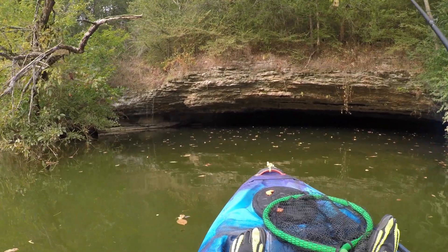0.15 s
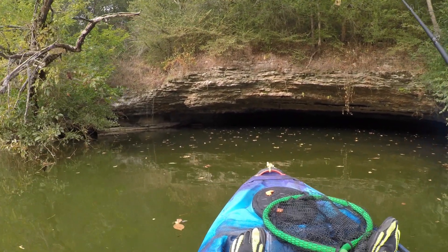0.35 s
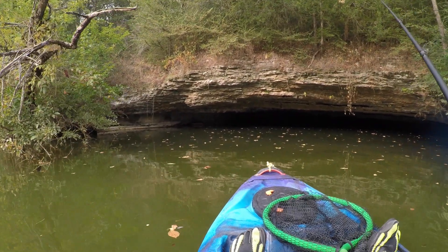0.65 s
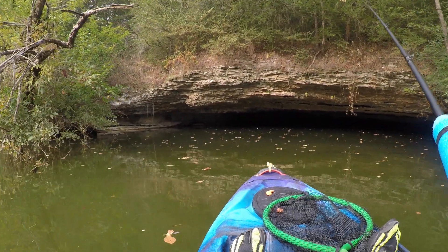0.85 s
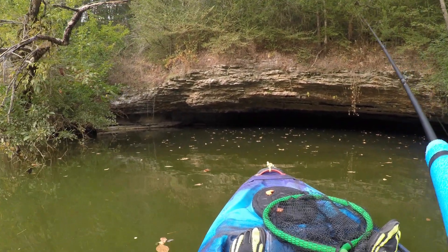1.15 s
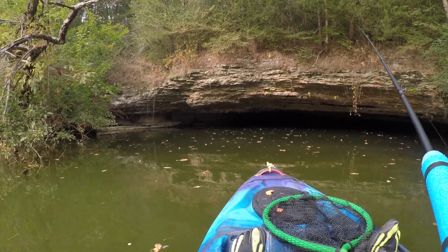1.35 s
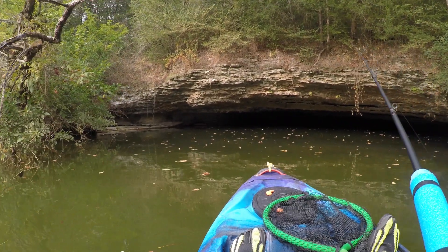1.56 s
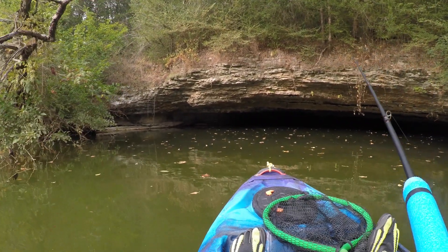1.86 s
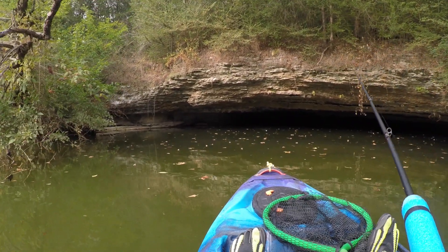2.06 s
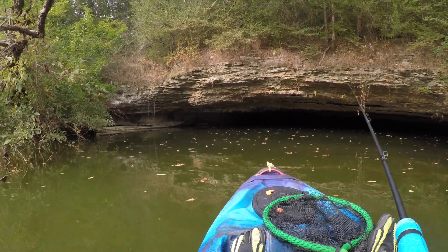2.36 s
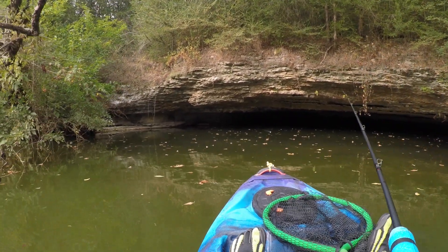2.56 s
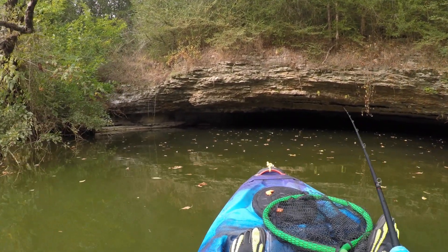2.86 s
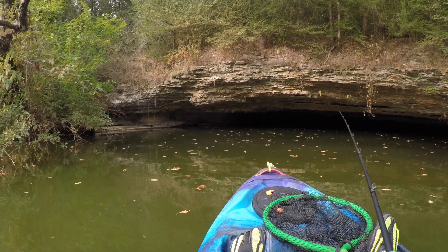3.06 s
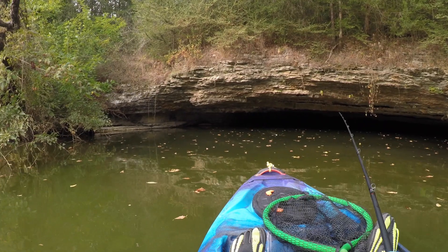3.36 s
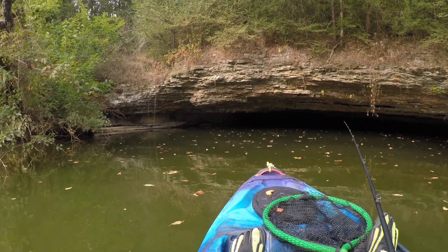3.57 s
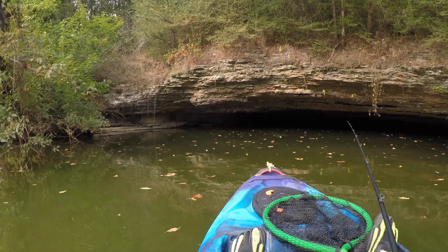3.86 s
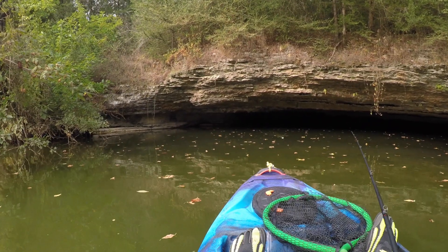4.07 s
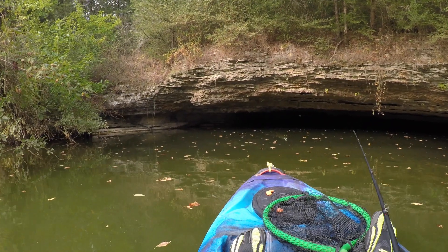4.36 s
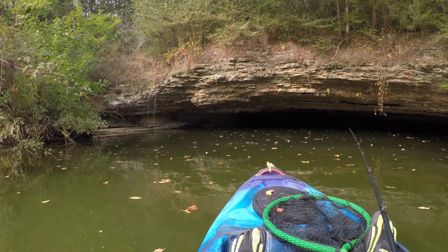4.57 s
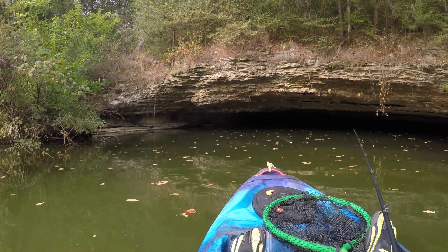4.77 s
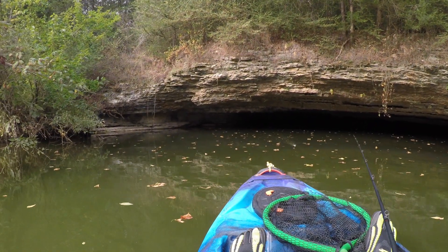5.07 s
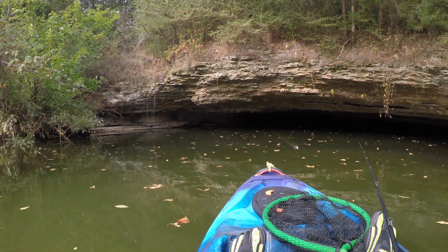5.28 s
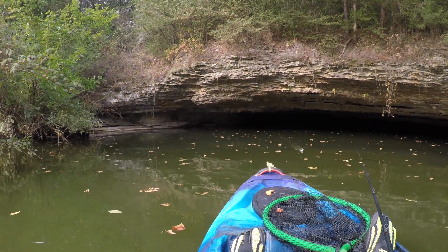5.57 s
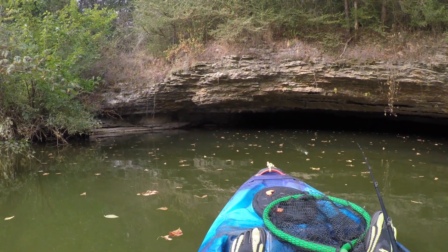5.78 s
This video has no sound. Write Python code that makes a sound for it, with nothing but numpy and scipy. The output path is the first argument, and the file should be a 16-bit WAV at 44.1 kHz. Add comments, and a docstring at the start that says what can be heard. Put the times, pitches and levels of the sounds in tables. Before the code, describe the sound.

A propeller plane drones over a wooded river throughout, a low hum above a broad, soft roar. The hum swells over the first second, dips near 3.3 seconds, is loudest around 4.2 and eases a little, its pitch slowly sinking as the plane recedes. A much quieter bird gives four short nasal calls on the right, at the very start and at about 1, 3.5 and 4.9 seconds, each scooping up and drooping with an echo among trees. Small drips plink on the right during the first 1.4 seconds over a faint, fading trickle. Katydids buzz in high phrases that build toward 2.5 and 4.5 seconds, with dry ticks around 1.3, from 3 to 3.7 and near 5.5. A thin cricket trill comes and goes, and far birds chip near 2.7 and 4.6 seconds. Leaves and distant insects hiss softly while a light breeze rumbles.

```python
"""A propeller plane drones away over a wooded river, heard from a drifting kayak.
Its blade tone sinks and fades through echoes over a broad roar, while a bird gives four nasal calls.
On the banks two katydids buzz and tick with their wings, a cricket trills and far birds chip.
Leaves and far insects hiss, a breeze rumbles, and water drips and trickles on the right."""
import sys
import numpy as np
from scipy import signal
from scipy.fft import rfft, irfft
from scipy.io import wavfile
from scipy.ndimage import uniform_filter1d

SR = 44100
rng = np.random.default_rng(int(sys.argv[2]) if len(sys.argv) > 2 else 0)


def inscribe(sig):
    """Save sig as 16-bit PCM at rate SR to the path in sys.argv[1].

    A 1-D sig is mono; a 2-D sig holds one channel per row.
    Samples are clipped to [-1, 1] before scaling.
    """
    pcm = np.round(np.clip(np.atleast_2d(sig).T, -1, 1) * 32767)
    wavfile.write(sys.argv[1], SR, pcm.astype(np.int16))


N = 260631

# Phase between the ears. Each row: frequency in Hz, lead of the left side in radians.
LEFT_LEAD = [(20, 0), (600, .3), (1000, .5), (1500, 1.8), (2200, 2), (2600, .2), (4200, .1), (4800, -2.4),
             (6500, -2.3), (9000, -3.2), (12000, -3.3), (13500, -5), (15000, -5.5)]


def amp(db):
    """Decibels to gain."""
    return 10 ** (np.asarray(db) / 20)


def unit_rms(x):
    """Scales x to rms 1."""
    return x / np.sqrt(np.mean(abs(x) ** 2) + 1e-20)


def spectrum_at(rows, hz):
    """Reads a spectrum table on a log-frequency axis."""
    row_hz, values = np.transpose(rows)
    return np.interp(np.log(hz + 1), np.log(row_hz + 1), values)


def curves_at(rows, t):
    """Reads every curve of a timed table at the times t."""
    times, *curves = np.transpose(rows)
    return [np.interp(t, times, curve) for curve in curves]


def panned(x, lean_db):
    """Places x in stereo; lean_db is left minus right."""
    return np.array([x * amp(lean_db / 2), x * amp(-lean_db / 2)])


def wander(hz, size=N):
    """Random drift of rms 1, changing about hz times a second."""
    white = rng.standard_normal(size + SR // 4)
    return unit_rms(signal.lfilter(*signal.butter(2, hz / (SR / 2)), white)[-size:])


def diffuse_noise(colour, patchy_db, tilt=None, size=1024):
    """Wide noise of rms 1 in drifting patches; tilt(t, hz) adds a moving colour in dB."""
    # Stereo width. Each row: frequency in Hz, likeness of the two sides from 0 to 1.
    likeness = [(30, .3), (70, .7), (150, .75), (350, .55), (550, .6), (750, .2), (1100, .2), (1600, .42),
                (2600, .3), (3600, .5), (4800, .37), (6000, .45), (8000, .48), (10000, .48), (11500, .3),
                (13000, .4), (15000, .45)]
    # Stereo balance. Each row: frequency in Hz, left minus right in dB.
    balance = [(60, -9), (120, -0.5), (240, 8.5), (470, 0), (940, 1.5), (1870, -3), (3720, -5.5),
               (7410, -2), (14700, -3.5)]
    hop = size // 4
    frames, hz = N // hop + 5, np.fft.rfftfreq(size, 1 / SR)[:, None]
    a, b, c, d, patches = rng.standard_normal((frames, len(hz), 5)).T
    patches = unit_rms(uniform_filter1d(uniform_filter1d(patches, size=9, axis=0), size=16, axis=1))
    shared, lean_db = np.clip(spectrum_at(likeness, hz), 0, 1), spectrum_at(balance, hz)
    right = a + 1j * b
    left = shared * right * np.exp(1j * spectrum_at(LEFT_LEAD, hz))
    left += np.sqrt(1 - shared ** 2) * (c + 1j * d)
    spectra = np.array([left * amp(lean_db / 2), right * amp(-lean_db / 2)])
    spectra *= amp(spectrum_at(colour, hz) + patchy_db * patches)
    if tilt:
        spectra *= amp(tilt(np.arange(frames) * hop / SR, hz))
    return unit_rms(signal.istft(spectra, nperseg=size, noverlap=size - hop)[1][:, :N])


def blips(events, ring_s, noisy, lean_db, rise=0.012):
    """Short dying tones in a puff of noise; the pitch climbs by the share rise each ring time."""
    size = 4000
    out, age = np.zeros(N + size), np.arange(size) / SR / ring_s
    for (start, db, hz), white in zip(events, rng.standard_normal((len(events), size))):
        tone = np.sin(2 * np.pi * hz * ring_s * age * (1 + rise * (age / 2 - 1)))
        puff = unit_rms(signal.lfilter(*signal.butter(2, (hz * .85, hz * 1.3), "band", fs=SR), white))
        at = round(start * SR)
        out[at:at + size] += amp(db) * age * np.exp(1 - age) * (tone + noisy * puff)
    return panned(out[:N], lean_db)


def wing_strokes(per_s, depth):
    """A level that throbs once per wing stroke, no two strokes alike."""
    turns = np.cumsum(per_s * (1 + .012 * wander(2.9))) / SR + rng.random()
    throb = 1 + depth * np.cos(2 * np.pi * turns)
    return throb * amp(0.98 * wander(25)) / np.sqrt(1 + depth ** 2 / 2)


def buzz_envelope(phrases, t, strokes_per_s, edge_s=0.068):
    """Each throbbing phrase sets in and breaks off quickly, its level sliding evenly in between."""
    level, depth = np.zeros(N), np.zeros(N)
    for start, end, first_db, last_db, throb in phrases:
        gate = np.clip(np.minimum(t - start, end - t) / edge_s + .5, 0, 1)
        level += gate * amp(np.interp(t, (start, end), (first_db, last_db)))
        depth += gate * throb
    return level * wing_strokes(strokes_per_s, np.clip(depth, 0, 1))


def hiss(t):
    """Leaves and far insects blend into a bright bed."""
    # Swell of the bed. Each row: time in seconds, level in dB.
    levels = [(0.0, -49.5), (0.5, -50.5), (1.25, -49), (2.0, -50.5), (2.43, -50), (2.9, -54), (4.5, -50.5),
              (5.0, -53.5), (5.91, -51)]
    # Its colour. Each row: frequency in Hz, relative level in dB.
    colour = [(1000, -35), (2500, -2.5), (3500, -6.5), (4700, -9.5), (5700, -3), (6900, -1.5), (8300, -5.5),
              (9500, -13), (12000, -23), (14000, -29), (15300, -43)]
    return amp(curves_at(levels, t)[0]) * diffuse_noise(colour, patchy_db=1.3)


def breeze(t):
    """A gusty breeze buffets each side with its own lumpy rumble, stronger on the left."""
    # Strength of the breeze. Each row: time in seconds, level in dB before gusts and balance.
    levels = [(0.0, -37.5), (1.4, -33), (1.85, -39), (2.3, -29.5), (2.7, -45), (3.1, -38), (4.2, -45),
              (5.0, -41), (5.91, -37)]
    band = signal.butter(3, (14, 48), "band", fs=SR, output="sos")
    rumble = unit_rms(signal.sosfilt(band, rng.standard_normal((2, N))))
    gust_db = 3.5 * wander(hz=4.7)
    return amp(curves_at(levels, t)[0] + gust_db + np.array([[1.5], [-4]])) * rumble


def trickle(t):
    """Drops of random size ring small hollows at the bank, fading as the kayak drifts on."""
    drops_per_s, ring_s, fade_db_per_s = 350, .003, 2.5
    drops = amp(4.5 * np.minimum(rng.exponential(1, N), 4)) * (rng.random(N) < drops_per_s / SR)
    hollow = rng.integers(0, 12, N)
    out, age = np.zeros(N), np.arange(1500) / SR / ring_s
    for k, hz in enumerate(np.geomspace(1650, 2150, 12)):
        ring = age * np.exp(-age) * np.sin(2 * np.pi * hz * ring_s * age)
        out += signal.oaconvolve(drops * (hollow == k), ring)[:N]
    return panned(amp(-59.5 - fade_db_per_s * t) * unit_rms(out), lean_db=-21.5)


def drips():
    """The loudest drops plink and splash, right of centre."""
    # Single drops. Each row: start in seconds, level in dB, pitch in Hz.
    drops = [(0.1895, -48, 1820), (0.2264, -42, 1770), (0.2828, -46.5, 1810), (0.4783, -47.5, 1830),
             (0.5202, -47.5, 1830), (0.7417, -47.5, 1920), (0.7741, -50, 1980), (0.8026, -43, 1750),
             (0.9852, -47, 1930), (1.0889, -48.5, 1710), (1.3204, -47.5, 1860), (1.3594, -47, 1860),
             (2.4209, -51.5, 1620), (3.3682, -50, 2220), (5.876, -48, 1810)]
    return blips(drops, ring_s=.0035, noisy=.6, lean_db=-7)


def far_birds():
    """Tiny raspy chips from far birds."""
    # Single chips. Each row: start in seconds, level in dB, pitch in Hz.
    chips = [(2.629, -50.5, 3930), (2.775, -52, 3080), (4.586, -46, 3970)]
    return blips(chips, ring_s=.0033, noisy=.4, lean_db=-1)


def cricket(t):
    """Fast wing strokes pulse a narrow band near 7.9 kHz into a trill."""
    # Swell of the trill. Each row: time in seconds, level in dB.
    levels = [(0, -74), (1, -55.5), (2, -55.5), (3, -63.5), (4, -57), (5, -68), (5.91, -57)]
    colour = [(7500, -37), (7790, -10), (7860, -13.5), (7940, -9.0), (8250, -38)]  # Hz, relative dB
    wing = diffuse_noise(colour, patchy_db=.5)
    return amp(curves_at(levels, t)[0]) * wing_strokes(per_s=55.6, depth=0.84) * wing


def katydids(t):
    """A low and a high katydid buzz at about sixty wing strokes a second; lone strokes tick."""
    # Wing colours. Each row: frequency in Hz, relative level in dB.
    low_colour = [(6000, -29), (8300, -2.5), (9500, -4.5), (10300, -2), (11500, -11.5), (13000, -27)]
    high_colour = [(9000, -30), (11200, -8), (12300, -1), (14000, -5.5), (14900, -13), (15300, -26)]
    # Buzzes. Each row: start and end in seconds, first and last level in dB, throb depth from 0 to 1.
    low_phrases = [(.25, 1.4, -64.5, -63, 0.4), (1.45, 2.55, -60, -50.5, 0.3),
                   (2.56, 2.95, -59, -57.5, .27), (2.96, 3.75, -65, -69, .27), (3.78, 4.58, -61, -54, 0.4),
                   (4.6, 5.41, -58, -53, 0.3), (5.67, 6.0, -57, -59, .27)]
    high_phrases = [(.35, 1.23, -69, -62, .2), (1.45, 2.5, -74, -55.5, .2), (2.52, 2.95, -59.5, -57, .45),
                    (3.2, 3.75, -88, -72, .6), (3.8, 4.57, -60.5, -52.5, .55), (4.59, 5.4, -68, -62, .2),
                    (5.66, 6.0, -60.5, -52, 0.8)]
    # Lone strokes. Each row: start in seconds, level in dB, share of the high wing from 0 to 1.
    ticks = [(1.2394, -54, 0.5), (1.294, -55, 0.4), (1.3533, -51, 0.3), (1.4087, -52, 0.4),
             (3.0714, -47.5, 0.25), (3.1428, -50, 0.4), (3.2665, -50, 0.25), (3.3313, -46.5, 0.3),
             (3.4979, -49, 0.2), (3.5738, -47, 0.3), (3.684, -50, 0.5), (5.3637, -51, 0.7),
             (5.4241, -44.5, 0.6), (5.6057, -45.5, 0.67)]
    low = diffuse_noise(low_colour, patchy_db=0.56, size=256)
    high = diffuse_noise(high_colour, patchy_db=1.2, size=256)
    out = buzz_envelope(low_phrases, t, strokes_per_s=63.3) * low * amp([[-2.5], [-.3]])
    out += buzz_envelope(high_phrases, t, strokes_per_s=60.9) * high
    for start, db, share in ticks:
        age = np.maximum(t - start, 0) / .0045  # a tick peaks after 4.5 ms
        out += amp(db) * age * np.exp(1 - age) * ((1 - share) * low + share * high)
    return out


def among_trees(voice):
    """Sets a voice to the right and smears it with echoes from near trunks and the far bank."""
    lag = np.arange(SR // 2) / SR
    trunks, far_bank = amp(-60 * lag / .25), amp(-5 - 60 * lag / 1.2)
    echoes = rng.standard_normal((2, len(lag))) * (trunks + far_bank) * (lag > .006)
    wet = signal.fftconvolve(voice[None], echoes / np.linalg.norm(echoes[0]), axes=1)[:, :N]
    lead = spectrum_at(LEFT_LEAD, np.fft.rfftfreq(N, 1 / SR))
    left = irfft(rfft(voice) * np.exp(1j * lead), N)
    return np.array([left, voice]) * amp([[-4.5], [2.5]]) + amp(-2.0) * wet


def bird():
    """A fluttering nasal stack of harmonics scoops up, droops and breaks up as each call dies."""
    # Calls. Each row: start and length in seconds, unbent fundamental in Hz, level and swell in dB.
    calls = [(-0.09, .45, 903.6, -47.5, -3), (1.025, 0.37, 900.4, -50.5, 1), (3.504, .41, 889, -57, 8.5),
             (4.911, .41, 901, -47, -4)]
    # Timbre, with no fundamental. Each row: harmonic number, relative level in dB.
    harmonics = [(3, -18), (4, 0), (5, -29), (6, -17), (7, -18), (8, -6)]
    scoop_s, attack_s, release_s, accent_s = 0.031, .055, .1, 0.018
    out = np.zeros(N)
    for start, length, hz, level_db, swell_db in calls:
        t = np.arange(0, length, 1 / SR)
        progress = t / length
        scoop = .12 * np.exp(-t / scoop_s)
        droop = .11 * np.sin(np.pi / 2 * progress ** 1.5) ** 2
        jitter = (.003 + 0.044 * progress ** 3) * wander(95, len(t))
        phase = 2 * np.pi * np.cumsum(hz * (1 - scoop - droop) * (1 + jitter)) / SR
        db = level_db + swell_db * progress
        db -= 12 * np.maximum(1 - t / attack_s, 0)
        db -= 19 * np.maximum(1 - (length - t) / release_s, 0)
        db += 4 * np.exp(-((length - 0.12 - t) / accent_s) ** 2)  # a push on the closing fall
        voice = np.zeros(len(t))
        for k, harmonic_db in harmonics:
            break_db = (k == 5) * 17 * progress ** 2  # the fifth comes up as the voice breaks
            voice += amp(harmonic_db + break_db + 3.2 * wander(65, len(t))) * np.sin(k * phase)
        call = np.sqrt(2) * amp(db) * voice * signal.windows.tukey(len(t), .1)
        at = round(start * SR) + np.arange(len(t))
        out[at[at >= 0]] += call[at >= 0]
    return out


def plane_roar():
    """The roar's bands fade in turn as the air bends their path; its top dulls as the plane recedes."""
    # Colour of the roar. Each row: frequency in Hz, relative level in dB.
    colour = [(20, -19), (45, -12), (80, -4), (150, 1), (260, -8), (480, -4.5), (680, -16), (850, -11.5),
              (1150, -18), (1350, -17.5), (1900, -22), (2600, -29.5), (4000, -43), (6000, -73)]
    # Its swells. Each row: time in seconds, lift of the low band in dB, lift of the upper bands in dB.
    swells = [(0.0, -5.5, -2), (0.9, -2, -0.5), (1.07, 0.5, 2.5), (1.4, -1.5, 0), (1.97, -1, 1.5),
              (2.12, -0.5, -2), (2.58, 1, 2), (2.78, 1, -1), (3.52, 4, -0.5), (3.73, 2, 5), (3.9, 0.5, 1),
              (4.45, 4.5, 2), (4.82, 2.5, -0.5), (5.25, 5.5, 3), (5.5, -1, -2), (5.91, -9, -1.5)]
    dulling_db_per_s = 0.36

    def tilt(t, hz):
        """Moving colour in dB over three soft bands."""
        low_db, upper_db = curves_at(swells, t)
        low, middle, top = (np.exp(-np.log2(hz / centre_hz + 1e-9) ** 2 / spread)
                            for centre_hz, spread in ((450, 0.38), (950, 0.39), (1600, 0.8)))
        return low_db * low + upper_db * (middle + top) - dulling_db_per_s * (t - t.mean()) * top
    return amp(-36.5) * diffuse_noise(colour, patchy_db=1.1, tilt=tilt, size=2048)


def propeller(t):
    """The blade tone and two overtones sink as the plane recedes, fading in and out through echoes."""
    # The drone. Each row: time in seconds, blade rate in Hz, level in dB, left minus right in dB,
    # lead of the left side in ms, levels of the second and third harmonics in dB.
    flight = [(0.0, 107.8, -42.5, -5, 1.1, -38.5, -71), (0.22, 107.3, -42, 3, 0.29, -39, -48.5),
              (0.45, 106.6, -30, -4.5, 0.89, -39, -51), (0.75, 105.8, -23, -2, 0.98, -45, -52),
              (1.1, 105.1, -18, 0, 0.92, -41, -53), (1.55, 104.4, -18.5, 0, 0.73, -41, -38),
              (1.95, 103.2, -21.5, 0, 1.14, -41, -54.5), (2.25, 102.8, -21, -4, 0.57, -37, -41),
              (2.62, 102.2, -19.5, -2.5, 0.55, -33, -47.5), (3.0, 102.0, -23, -2.5, 0.76, -39.5, -52),
              (3.3, 101.6, -31.5, -2, 0.66, -46, -40), (3.62, 100.8, -22.5, 1, 0.41, -40, -48),
              (4.2, 99.6, -16.5, 2.5, 0.26, -44, -48.5), (4.78, 99.0, -18.5, 6, 0.76, -40.5, -62),
              (5.05, 98.4, -22.5, 3.5, 1.97, -52, -48), (5.4, 97.7, -24.5, -4, 1.5, -42, -61),
              (5.62, 97.8, -21.5, -6.5, 0.57, -41.5, -64), (5.91, 97.9, -23.5, -4, 0.46, -43, -71)]
    hz, db, lean_db, lead_ms, second_db, third_db = curves_at(flight, t)
    side = np.array([[1], [-1]])
    phase = 2 * np.pi * np.cumsum(hz) / SR + side * np.pi * hz * lead_ms / 1000
    tone = amp(db + side * lean_db / 2 + 0.82 * wander(17.8)) * np.sin(phase)
    tone += amp(second_db + 1.4 * wander(13)) * np.sin(2 * phase + 0.86 * wander(4.4) - np.pi / 2)
    tone += amp(third_db + 1.5 * wander(12.4)) * np.sin(3 * phase + 1.32 * wander(4.5))
    return np.sqrt(2) * tone


def scene():
    """Mixes the water, the plane and the life on the banks."""
    t = np.arange(N) / SR
    water = trickle(t) + drips()
    plane = propeller(t) + plane_roar()
    banks = breeze(t) + among_trees(bird()) + far_birds() + katydids(t) + cricket(t) + hiss(t)
    return water + plane + banks


def record(dry):
    """Cuts the treble steeply at 15.25 kHz."""
    lowpass = signal.firwin(511, 15250, window=("kaiser", 9), fs=SR)
    return signal.oaconvolve(dry, lowpass[None], "same")


dry = scene()
out = record(dry)
inscribe(out)
```